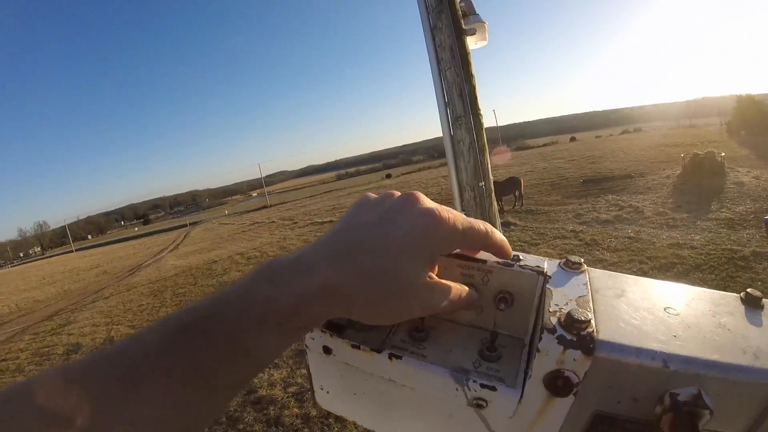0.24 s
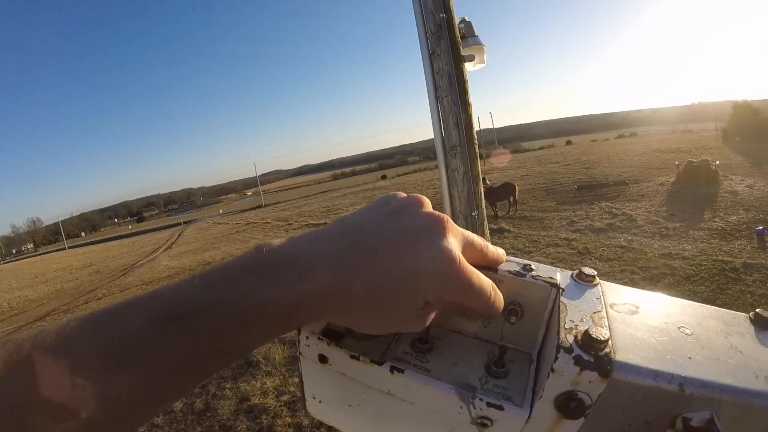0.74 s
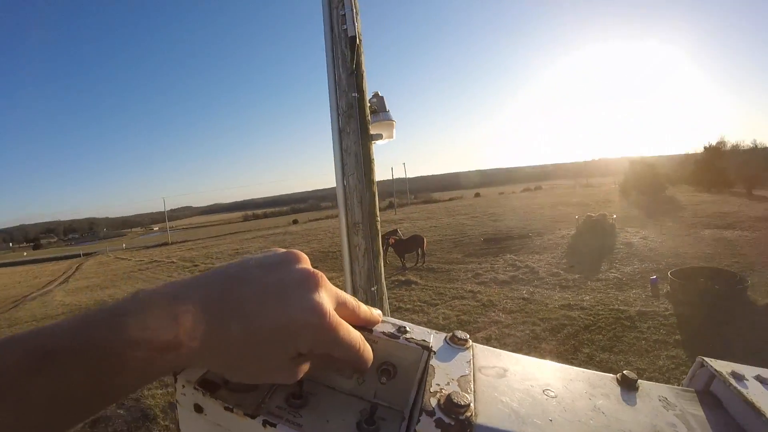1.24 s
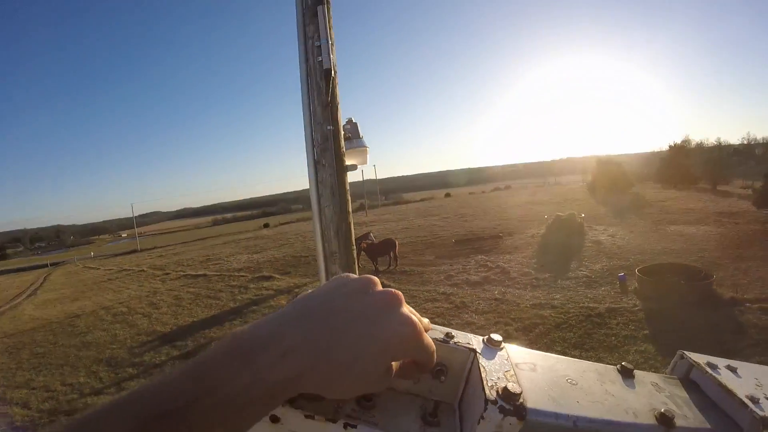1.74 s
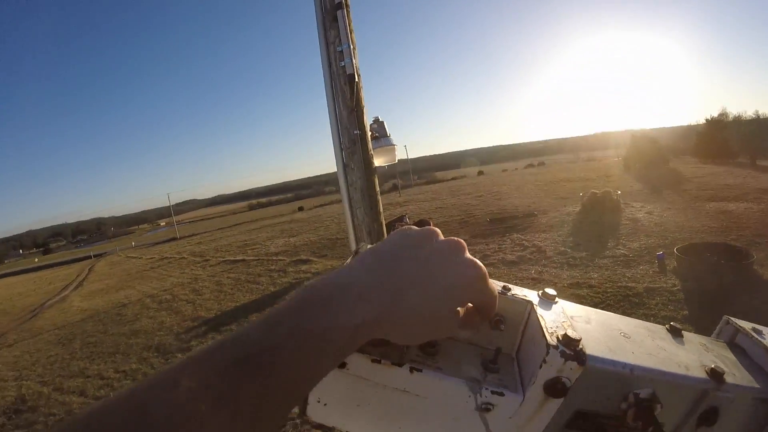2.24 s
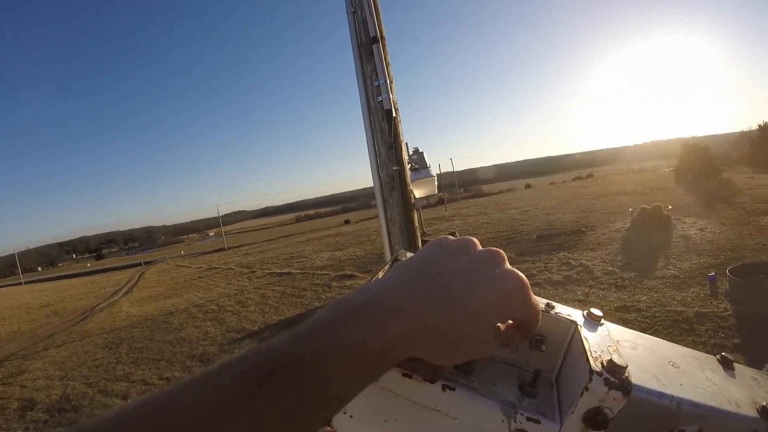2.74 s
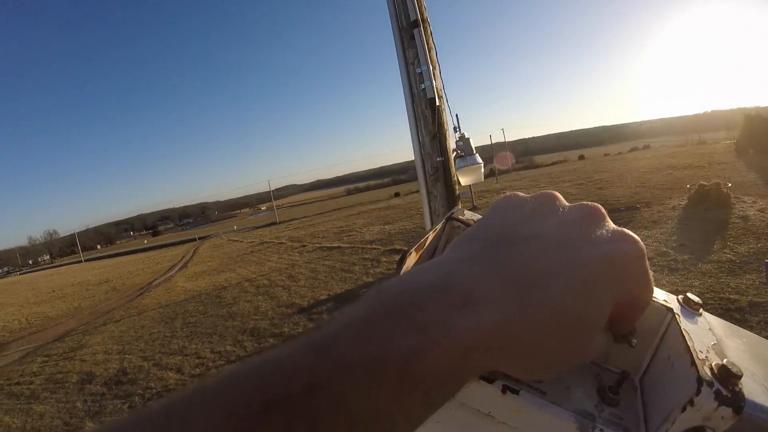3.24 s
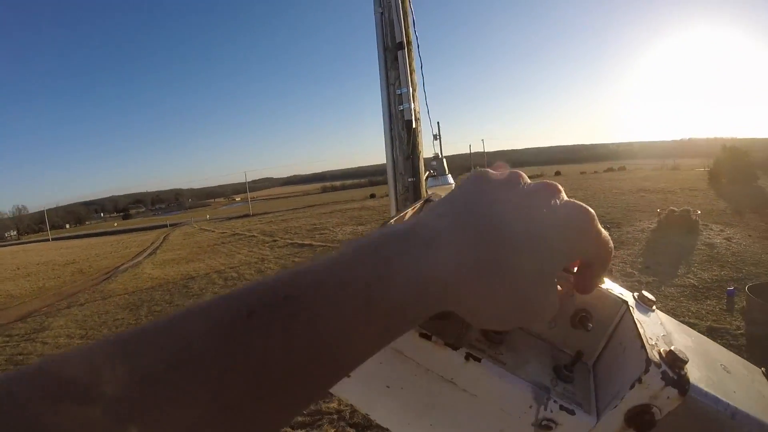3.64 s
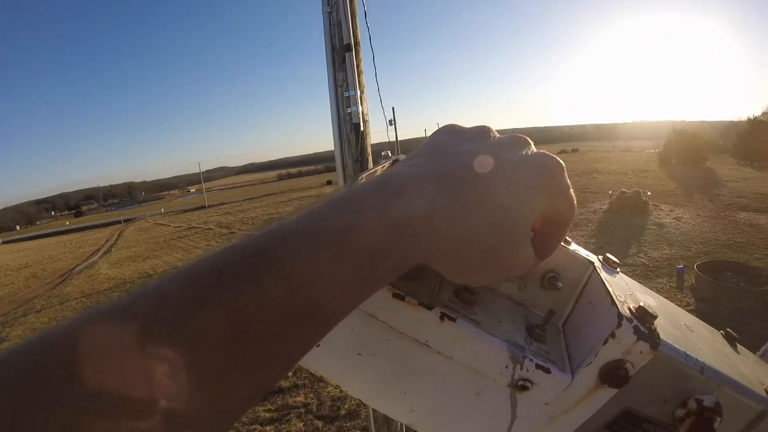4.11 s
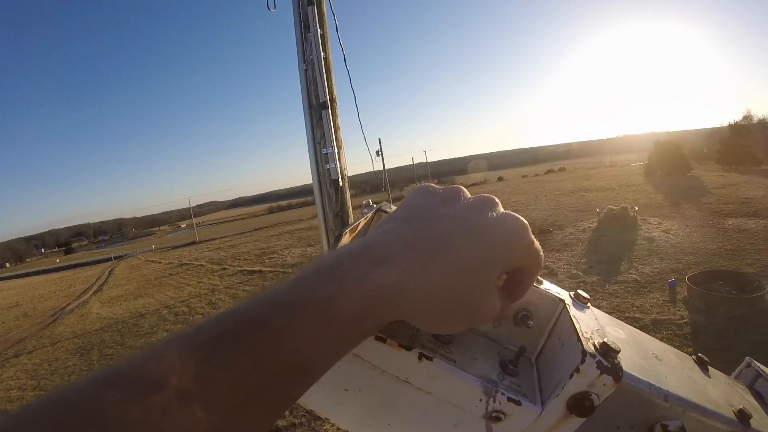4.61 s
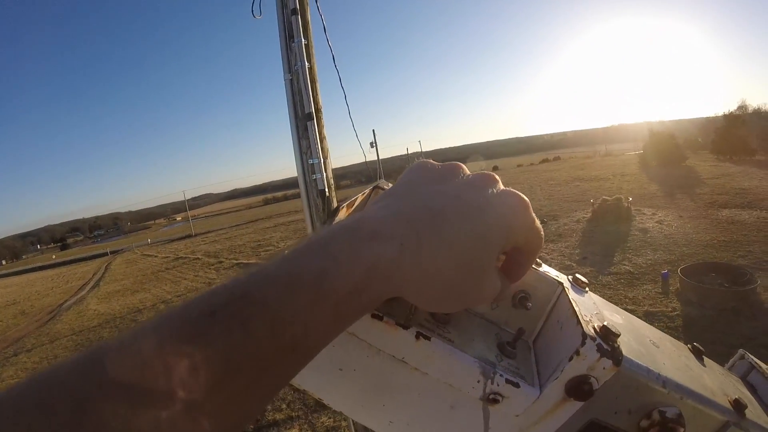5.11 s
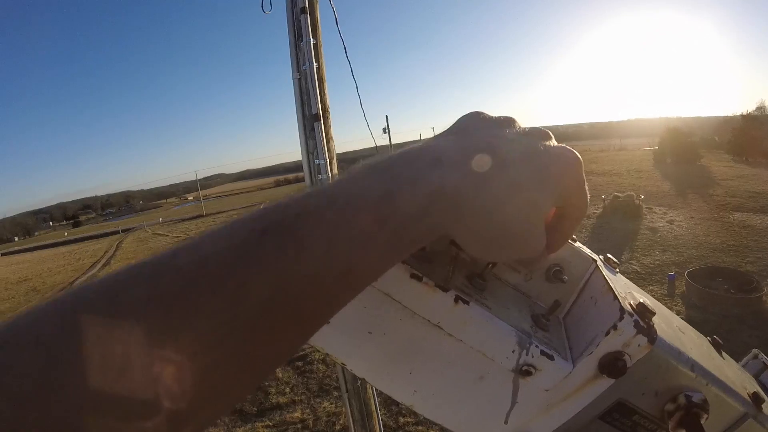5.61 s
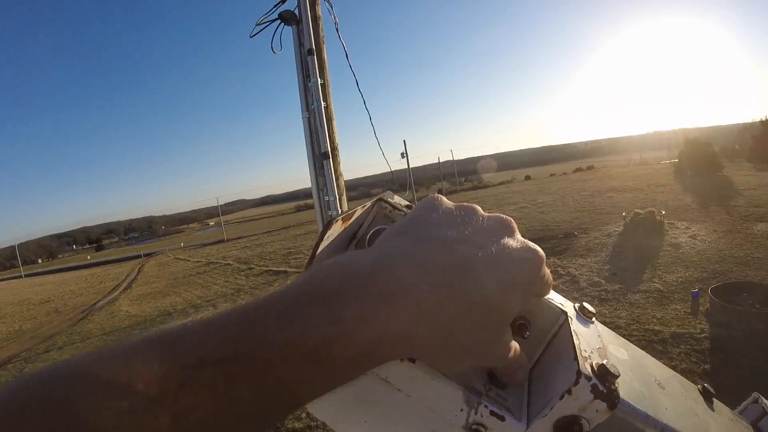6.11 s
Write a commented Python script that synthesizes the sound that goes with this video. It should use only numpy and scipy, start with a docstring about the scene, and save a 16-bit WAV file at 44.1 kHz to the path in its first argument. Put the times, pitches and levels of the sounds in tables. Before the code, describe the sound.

Heard outdoors from inside a lift bucket, a truck engine runs with a low, even drone and a wavering hydraulic hum on top. Small metal clicks and faint rubbing come from the nearby controls, mostly in the first half, and wind lightly bumps the microphone. Finally a lever springs back with a sharp metallic crack, the pump hum fades, and the bucket jolts with a few knocks.

```python
"""Bucket truck lifting its boom.

Heard outdoors from the bucket: a V8 drones below, turning a fan, an alternator and a humming hydraulic pump.
Oil hisses in the valve, the controls tick under a hand, gusts thump. Near the end the steel lever
snaps back, the pump unloads, the engine picks up and the bucket shudders and rattles."""
import sys
import numpy as np
from scipy import signal
from scipy.fft import rfft, irfft, next_fast_len
from scipy.io import wavfile
from scipy.ndimage import map_coordinates

SR = 44100
rng = np.random.default_rng(int(sys.argv[2]) if len(sys.argv) > 2 else 0)


def to_wav(s):
    """Save 16-bit WAV."""
    ch = np.atleast_2d(s).T  # columns
    pcm = np.round(np.clip(ch, -1, 1) * 32767)  # PCM
    wavfile.write(sys.argv[1], SR, pcm.astype(np.int16))


N = 280476

# Lever leaves the hand, then hits its stop. Each row: start in seconds, relative crack level in dB.
LEVER_SNAPS = [(5.894, -25), (5.94, -14.5)]
BOUNCE_HZ, FIRST_SURGE_S = 9, 0.183  # boom bounce; first surge peak, counted from the stop


def hydraulic_pump(cycle_rad):
    """Pressure ripple, 32 pulses per engine cycle, hums through the boom."""
    # First and third harmonics. Each row: time in seconds, relative level in dB.
    first_levels = [(0.28, -30), (0.58, -23.5), (1.35, -25.5), (1.6, -22.5), (2.4, -23.5), (3.2, -28.5),
                    (5.9, -27.0)]
    third_levels = [(0, -48), (0.7, -52.5), (2.1, -51.5), (2.4, -48.0), (3.1, -57), (4.6, -49.5),
                    (5.5, -48.5), (5.9, -51)]
    # Standing-wave nodes the bucket crosses. Each row: time in seconds, half-width in seconds, dip in dB.
    nodes = [(1.25, .2, -15.5), (3.38, 0.33, -11.5)]
    t = np.arange(N) / SR
    ripple_rad = 32 * cycle_rad
    throb = 1 + 0.035 * tone(cycle_rad) + 0.011 * wobble(40)
    nodes_db = sum(db * np.exp(-((t - s) / width_s) ** 2) for s, width_s, db in nodes)
    second_db = -39.5 - 0.97 * (t - 3.44) ** 2 + nodes_db  # arches over mid-lift
    hum = 0
    for k, db in enumerate([curve(first_levels), second_db, curve(third_levels)], 1):
        hum += amp(db + 0.5 * k * wobble(9)) * np.sin(k * ripple_rad + 0.17 * k * wobble(25))
    fourth = amp(-68 + 3 * wobble(3)) * tone(4 * ripple_rad)
    return (amp(0.52) * hum * throb + fourth) * pump_load()


def pump_load():
    """1 during the lift; collapses at the stop, then returns in fading surges as the boom bounces."""
    unload_s, unloaded_db, loss_db_per_s = 0.01, -15.5, 27
    after_s = since_stop()
    held = np.exp(-after_s / unload_s)
    bouncing = after_s > FIRST_SURGE_S - 0.5 / BOUNCE_HZ
    surge_db = -3.5 - loss_db_per_s * (after_s - FIRST_SURGE_S)
    surge = bouncing * (1 + boom_bounce()) / 2 * amp(surge_db)
    return held + (1 - held) * (amp(unloaded_db) + surge)


def engine(cycle_rad):
    """Unequal cylinders put lines on multiples of the cycle; each firing also puffs noise."""
    # Exhaust lines. Each row: multiple of the eight-firing cycle, relative level in dB.
    exhaust_lines = [(3, -45), (4, -50), (5, -32), (6, -47), (7, -41), (8, -31.5), (9, -54), (11, -50),
                     (13, -53), (14, -56), (15, -50), (16, -43.5), (17, -48), (18, -56), (19, -45),
                     (20, -47), (21, -57), (22, -51), (24, -55), (34, -55), (36, -55)]
    # Engine bay; valve gear and fan. Each row: frequency in Hz, relative density in dB.
    bay_spectrum = [(20, -35), (32, -5), (60, -10), (85, -19.5), (120, -21), (180, -21.5), (260, -22),
                    (380, -21.5), (500, -25), (690, -24.5), (850, -38.5), (1300, -52.5)]
    clatter_spectrum = [(500, 7), (850, 1), (1100, -0.5), (1400, -3), (1700, -4), (2100, -1.5), (2700, -10),
                        (3400, -11), (4300, -15.5), (6000, -19.5), (9000, -25.5), (11000, -28),
                        (15000, -35)]
    shade = amp(-0.86 + 7.5 * np.exp(-np.arange(N) / SR / 1.66))  # upper lines fade as the bucket climbs
    drone = sum(amp(db - 0.84 + 0.22 * wobble(7.8)) * tone(k * cycle_rad) * (shade if k > 12 else 1)
                for k, db in exhaust_lines)
    burr = sum(amp(-59 - 0.25 * (k - 25) + 3.5 * rng.standard_normal()) * tone(k * cycle_rad)
               for k in range(25, 76))
    firing = np.cos(8 * cycle_rad)
    breeze = amp(0.5 * wobble(4) + 0.5 * wobble(12))  # moving air makes the distant noise waver
    bay = amp(-38.5) * noise(bay_spectrum) * (1 + 0.31 * firing)
    clatter = amp(-54) * noise(clatter_spectrum) * (1 + 0.058 * firing)
    return drone + burr + (bay + clatter) * breeze


def lever():
    """The spring twangs on release; then the lever strikes the valve cover."""
    # Each row: frequency in Hz, relative density in dB.
    crack_spectrum = [(410, -55), (700, -5), (1260, -24.5), (2060, -1), (2660, -20.5), (2830, -13),
                      (4670, -14), (6190, -17.5), (7220, -15.5), (9700, -20), (10600, -27), (12100, -19),
                      (15000, -38)]
    # Each row: frequency in Hz, relative level in dB, T60 in seconds.
    spring_modes = [(2523, 0, 0.078), (2580, 0.5, 0.3), (5160, -23, 0.097), (6551, -18, 0.043),
                    (7870, -9.5, 0.0315), (10026, -18, 0.034), (13870, -19, 0.036)]
    cover_modes = [(1750, -9.5, .063), (1900, -1.5, 0.068), (2084, 0.5, 0.086), (3600, -17, 0.073),
                   (4360, -18, 0.065), (8600, -28, .15)]
    out = np.zeros(N)
    decay = fade(0.015) + amp(-23) * fade(0.14)
    for s, db in LEVER_SNAPS:
        add(out, s, amp(db - 3.5) * decay * noise(crack_spectrum, size=SR // 2))
    (release_s, _), (stop_s, _) = LEVER_SNAPS
    add(out, release_s, amp(-27.5) * ring(spring_modes, scatter_db=0.4))
    add(out, stop_s, amp(-24.5) * ring(cover_modes, scatter_db=0.5))
    return out


def bucket():
    """The sudden stop shakes the bucket wall, its pivot and a loose steel part."""
    # Each row: frequency in Hz, relative density in dB.
    wall_spectrum = [(90, -31), (150, 2), (370, 2.5), (600, -5), (900, -15), (1900, -12.5), (3000, -23.5),
                     (5000, -33.5), (9000, -36), (15000, -49)]
    # Each row: start in seconds, relative level in dB, centre in Hz.
    pivot_knocks = [(5.99, -21, 210), (6.074, -27, 1580), (6.145, -22, 1600), (6.147, -36.5, 7228),
                    (6.22, -16.5, 300), (6.243, -33.5, 4100), (6.289, -38.5, 7420), (6.304, -29, 2400),
                    (6.349, -25.5, 1640)]
    # Each row: start in seconds, gain in dB.
    jingles = [(6.049, -46), (6.16, -39.5), (6.216, -43)]
    # Each row: frequency in Hz, relative level in dB, T60 in seconds.
    steel_modes = [(5000, -3, 0.074), (7250, -6, 0.033), (8900, -11.5, 0.064), (12000, -16.5, .04),
                   (14700, -19.5, .04)]
    jolt_t60_s = 0.17
    after_s = since_stop()
    judder = amp(3 * wobble(60))
    jolt = amp(-31 - 60 * after_s / jolt_t60_s)
    tremble = amp(-37) * (1 + 0.1 * boom_bounce())
    out = (after_s > 0) * (jolt + tremble) * noise(wall_spectrum) * judder
    for s, db, hz in pivot_knocks:
        add(out, s, amp(db - 6) * fade(blow_t60_s(hz)) * band(hz, q=2.2, size=SR // 2))
    for s, db in jingles:
        add(out, s, amp(db) * ring(steel_modes, scatter_db=2.5))
    return out


def controls():
    """A hand rubs over the control box; the linkage ticks against it."""
    # Each row: start in seconds, length in seconds, level in dB, centre in Hz.
    rubs = [(0.503, 0.56, -60, 3380), (1.19, 0.093, -43, 3760), (1.237, .12, -48, 3850),
            (1.449, 0.16, -49, 1980), (1.602, 0.29, -56.5, 1800), (2.19, 0.088, -53, 2700),
            (3.0, 0.38, -54.5, 1900), (3.548, 0.2, -55.5, 2280)]
    # Each row: start in seconds, relative level in dB, centre in Hz.
    ticks = [(.381, -31.5, 1374), (.544, -40.5, 4440), (0.747, -42, 2970), (1.194, -29.5, 4380),
             (1.195, -28.5, 1510), (1.231, -21, 1140), (1.231, -20.5, 2670), (1.29, -39, 2600),
             (1.336, -32.5, 1816), (1.46, -21.5, 845), (1.464, -28, 3050), (1.488, -29, 1700),
             (1.511, -28.5, 2870), (1.554, -30.5, 1400), (1.665, -31.5, 1190), (2.184, -40, 3800),
             (2.261, -33, 8060), (2.267, -34.5, 5030), (2.295, -40, 4480), (2.39, -30, 940),
             (2.399, -36.5, 4070), (2.414, -35.5, 6030), (2.424, -36.5, 5200), (2.562, -34.5, 1650),
             (2.565, -37.5, 5897), (3.347, -34.5, 1490), (4.291, -38.5, 2099)]
    out = np.zeros(N)
    for s, length_s, db, hz in rubs:
        add(out, s, amp(db) * swell(length_s, control_box(band(hz, q=0.6, size=SR))))
    out *= amp(1.4 * wobble(220))  # skin grips and slips
    for s, db, hz in ticks:
        add(out, s, amp(db - 4) * linkage_tick(hz))
    return out


def linkage_tick(hz):
    """A noisy blow of peak 1: part direct, part ringing the control box."""
    attack = 1 - fade(0.0023)
    contact = attack * fade(blow_t60_s(hz)) * band(hz, q=1.37, size=SR // 2)
    blow = control_box(contact) + amp(-10.5) * contact
    return blow / np.max(np.abs(blow))


def control_box(x):
    """x through the box's steep-sided resonances."""
    # Each row: centre in Hz, width in Hz, gain in dB.
    resonances = [(738, 110, 22.5), (997, 250, 12), (1500, 370, 7.5), (2340, 200, 2.5), (2793, 530, 3),
                  (3700, 370, -3), (4490, 380, -9.5), (6760, 1100, -17.5), (8700, 2100, -11),
                  (11400, 5200, -24.5)]
    return filtered(x, lambda f: sum(amp(db) * (1j * f * width / (hz * hz - f * f + 1j * f * width)) ** 2
                                     for hz, width, db in resonances))


def belt_drive(cycle_rad):
    """Fan and alternator whine, fading in and out on the way up to the bucket."""
    # Each row: multiple of the engine cycle, rms level in dB.
    fan_lines = [(7.6, -44.5), (42.08, -48), (50.1, -62.5)]
    # Each row: harmonic of the rotor, rms level in dB.
    alternator_lines = [(3, -54.5), (6, -71), (7, -70.5), (8, -69), (10, -73), (12, -81), (14, -80),
                        (15, -82)]
    # The rotor's strong ninth harmonic. Each row: time in seconds, relative level in dB.
    ninth_levels = [(.2, -56), (.45, -64.5), (1.6, -70.5), (2.15, -59.5), (3.0, -69.5), (3.8, -64.5),
                    (4.5, -57.5), (5.0, -62.5), (5.3, -58.5), (5.9, -63.5)]
    fan = sum(amp(db + 1.7 * wobble(3.9)) * tone(k * cycle_rad + 0.12 * wobble(10)) for k, db in fan_lines)
    rotor_rad = 23.74 * cycle_rad
    alternator = sum(amp(db + 1.7 * wobble(3)) * tone(k * rotor_rad) for k, db in alternator_lines)
    ninth = amp(curve(ninth_levels) + 0.3 + 2.5 * wobble(6.9)) * np.sin(9 * rotor_rad)
    return fan + alternator + ninth


def oil_valve():
    """Oil hisses steadily through the valve and surges as the lever is feathered."""
    # Each row: frequency in Hz, relative density in dB.
    hiss_spectrum = [(2000, -22), (3200, -3), (5000, -14), (6100, -2), (7000, -7.5), (8000, -3.5),
                     (9100, -1.5), (10000, -11), (11000, -17.5), (14500, -21.5)]
    # Each row: start in seconds, length in seconds, level in dB.
    surges = [(.46, 0.39, -80), (1.25, 0.49, -63), (1.558, 0.48, -60), (2.869, .48, -74),
              (3.445, 0.51, -70), (5.32, 0.24, -71)]
    flow = np.full(N, amp(-79.5))
    for s, length_s, db in surges:
        add(flow, s, amp(db) * swell(length_s, np.ones(SR)))
    return flow * noise(hiss_spectrum)


def wind():
    """Short gusts thump on the microphone."""
    # Each row: start in seconds, length in seconds, level in dB, centre in Hz.
    gusts = [(0.617, 0.23, -30.5, 50), (1.05, 0.31, -31, 40), (3.877, 0.073, -28, 65),
             (4.372, 0.089, -29, 35), (5.196, 0.074, -25.5, 75), (5.35, 0.12, -33, 74),
             (5.989, 0.075, -27.5, 45)]
    out = np.zeros(N)
    for s, length_s, db, hz in gusts:
        add(out, s, amp(db) * swell(length_s, band(hz, q=0.89, size=SR)))
    return out


def since_stop():
    """Seconds since the lever hit its stop, zero before."""
    return np.maximum(np.arange(N) / SR - LEVER_SNAPS[-1][0], 0)


def boom_bounce():
    """The boom's swing after the stop, -1 to 1."""
    return np.cos(2 * np.pi * BOUNCE_HZ * (since_stop() - FIRST_SURGE_S))


def blow_t60_s(hz):
    """Higher blows die sooner."""
    return 0.05 / (hz / 1000) ** 0.55


def amp(db):
    """Decibels to gain."""
    return 10 ** (np.asarray(db) / 20)


def unit(x):
    """Scale to rms 1."""
    return x / np.sqrt(np.mean(x ** 2) + 1e-20)


def curve(rows):
    """(seconds, value) rows to one value per sample."""
    return np.interp(np.arange(N) / SR, *np.transpose(rows))


def wobble(knots_per_s):
    """A smooth random curve."""
    knots = rng.standard_normal(int(N * knots_per_s / SR) + 4)
    grid = np.arange(0, N, 32)
    return np.interp(np.arange(N), grid, map_coordinates(knots, [grid * knots_per_s / SR]))


def filtered(x, response):
    """x through a response given as a function of Hz."""
    size = next_fast_len(len(x) + 4096)
    return irfft(rfft(x, size) * response(np.fft.rfftfreq(size, 1 / SR)), size)[:len(x)]


def noise(spectrum, size=N):
    """Noise of rms 1 with a (Hz, dB) spectrum."""
    hz, db = np.transpose(spectrum)
    response = lambda f: amp(np.interp(np.log(f + 1), np.log(hz), db, left=-120, right=-120))
    return unit(filtered(rng.standard_normal(size), response))


def band(centre_hz, q, size):
    """Noise of rms 1 in one broad resonance."""
    response = lambda f: 1 / (1 + 1j * q * (f / centre_hz - centre_hz / (f + 1))) ** 2
    return unit(filtered(rng.standard_normal(size), response))


def swell(length_s, source):
    """The source at rms 1 under a half-sine envelope."""
    t = np.arange(len(source)) / SR
    return np.sin(np.pi * np.minimum(t / length_s, 1)) * unit(source)


def fade(t60_s):
    """Half a second of exponential decay."""
    return np.exp(-np.log(1000) * np.arange(SR // 2) / SR / t60_s)


def ring(modes, scatter_db):
    """Struck modes, at new strengths for each blow."""
    t = np.arange(SR // 2) / SR
    return sum(amp(db + scatter_db * rng.standard_normal()) * fade(t60_s) * np.sin(2 * np.pi * hz * t)
               for hz, db, t60_s in modes)


def tone(phase_rad):
    """A sine of rms 1 with a random start."""
    return np.sqrt(2) * np.sin(phase_rad + rng.uniform(0, 2 * np.pi))


def add(track, start_s, sound):
    """Mix a sound in."""
    part = track[round(start_s * SR):][:len(sound)]
    part += sound[:len(part)]


def scene():
    """One crankshaft turns engine, belt and pump; it speeds up once the pump unloads."""
    # Engine speed under load. Each row: time in seconds, firing rate in Hz.
    loaded_speed = [(0, 75.6), (0.45, 76.3), (0.75, 76), (1.1, 78.2), (1.35, 77.2), (1.8, 77.28),
                    (2.05, 76.64), (2.4, 77), (2.8, 76.6), (3.4, 75.6), (4.5, 76), (5.0, 76.11), (5.3, 77),
                    (5.9, 76.4)]
    pickup_hz_per_s = 3.5
    firing_hz = curve(loaded_speed) + pickup_hz_per_s * since_stop()
    cycle_rad = 2 * np.pi * np.cumsum(firing_hz / 8) / SR
    machinery = engine(cycle_rad) + belt_drive(cycle_rad) + hydraulic_pump(cycle_rad)
    return (machinery + oil_valve() + controls() + lever() + bucket() + wind())[None]


def record(dry):
    """Brief fades at both ends and a hard band limit."""
    top_hz = 15200
    edges = signal.windows.tukey(N, 0.0015)
    return filtered(dry[0] * edges, lambda hz: hz < top_hz)[None]


dry = scene()
out = record(dry)
to_wav(out)
```